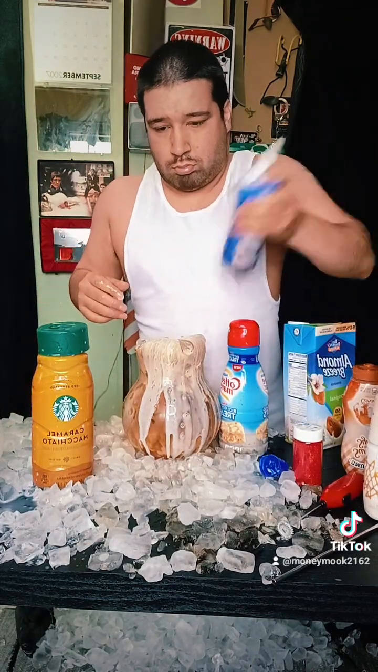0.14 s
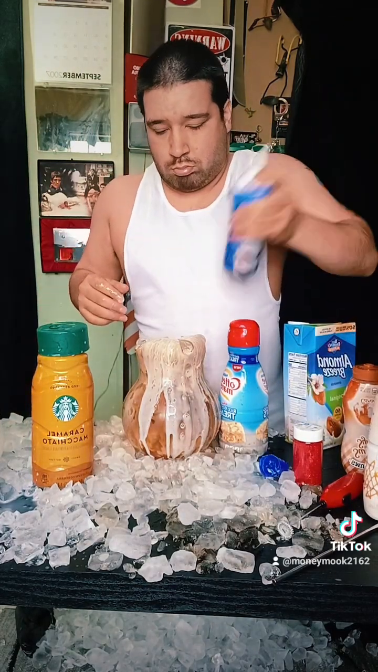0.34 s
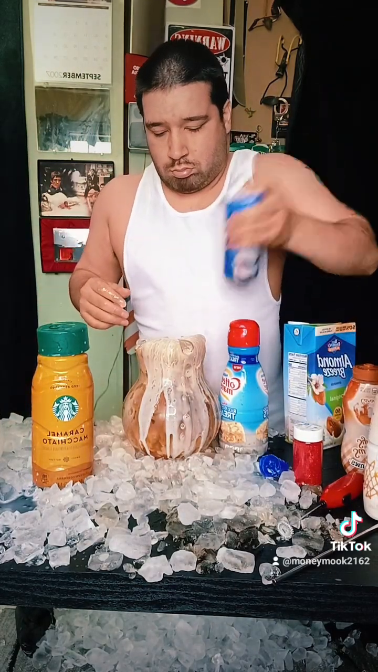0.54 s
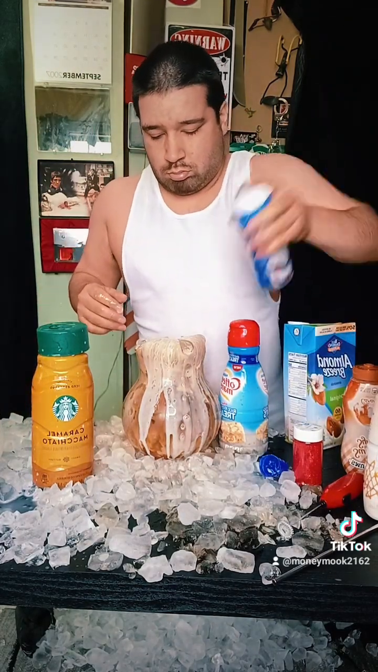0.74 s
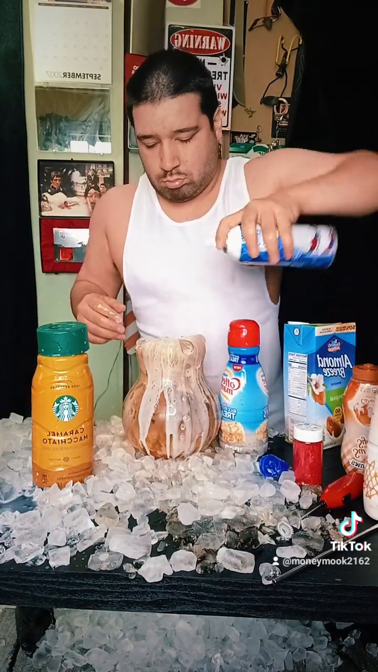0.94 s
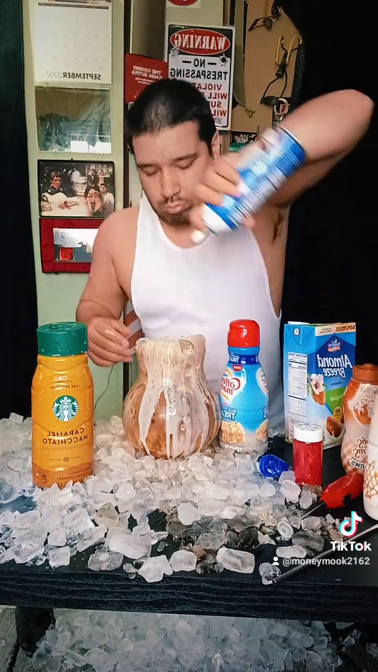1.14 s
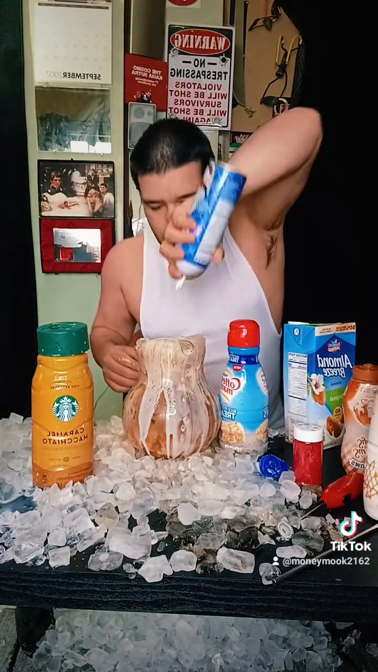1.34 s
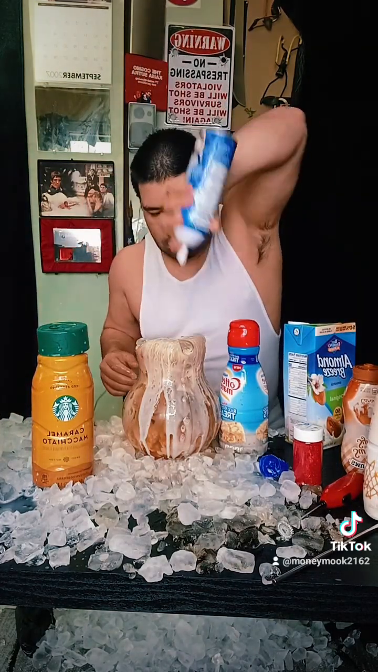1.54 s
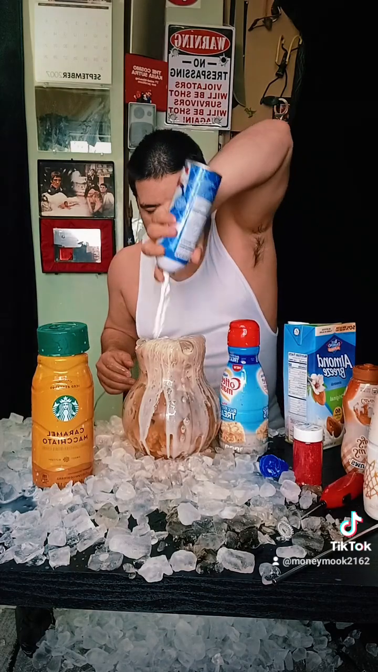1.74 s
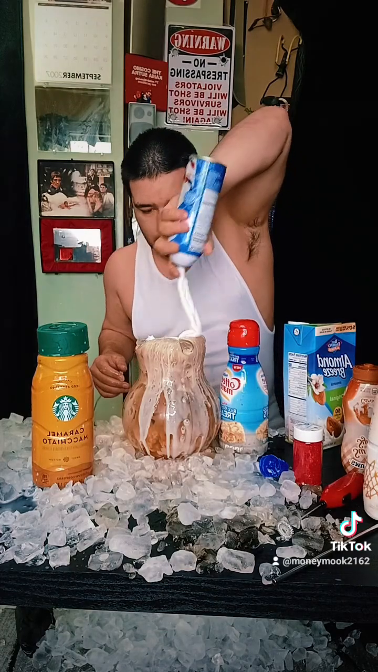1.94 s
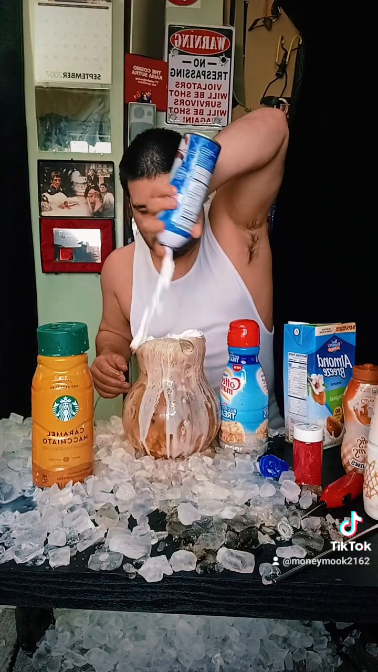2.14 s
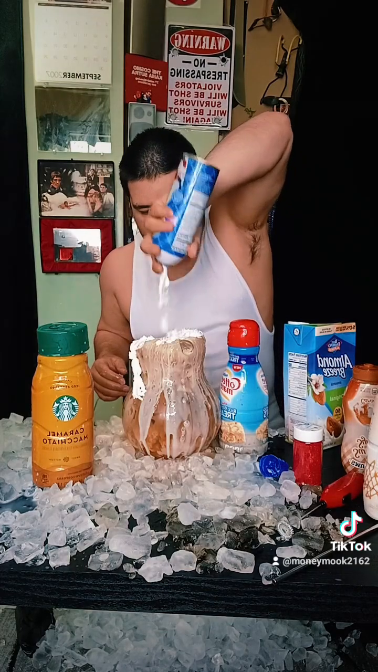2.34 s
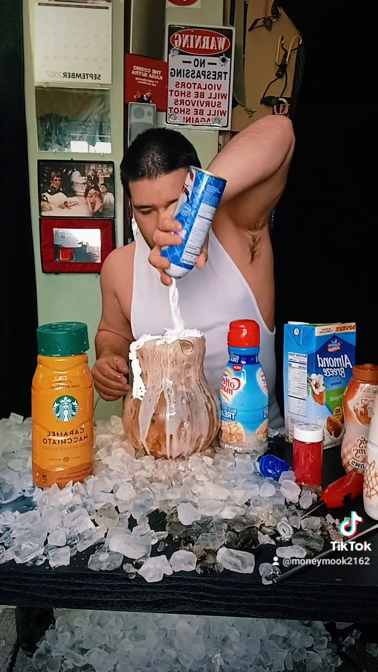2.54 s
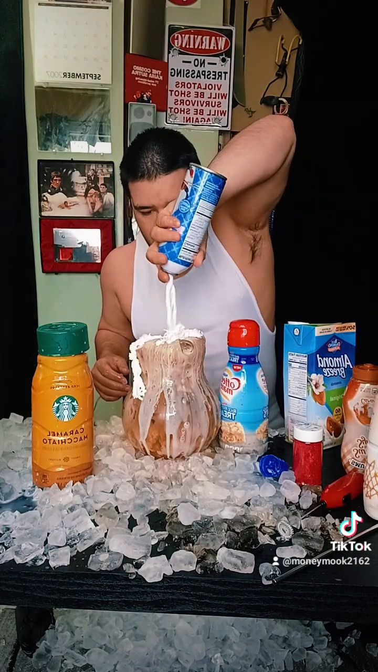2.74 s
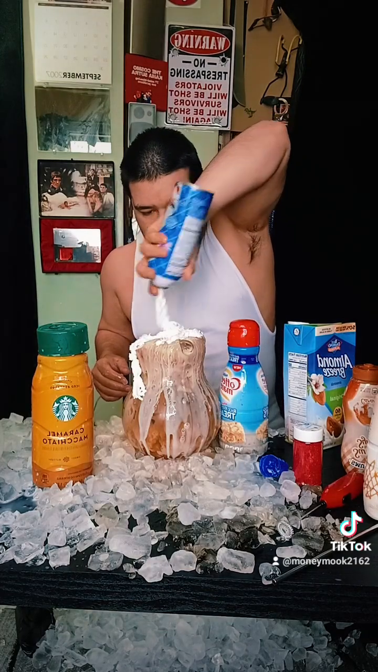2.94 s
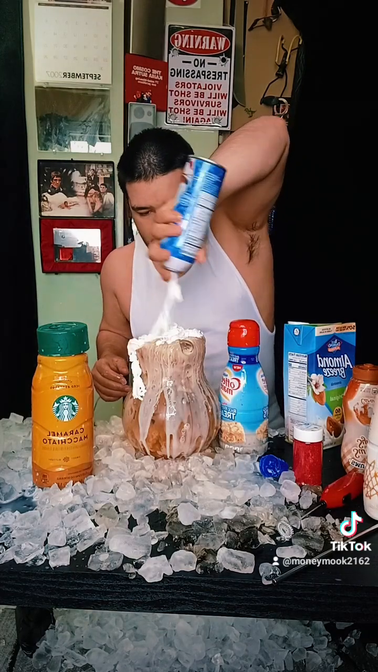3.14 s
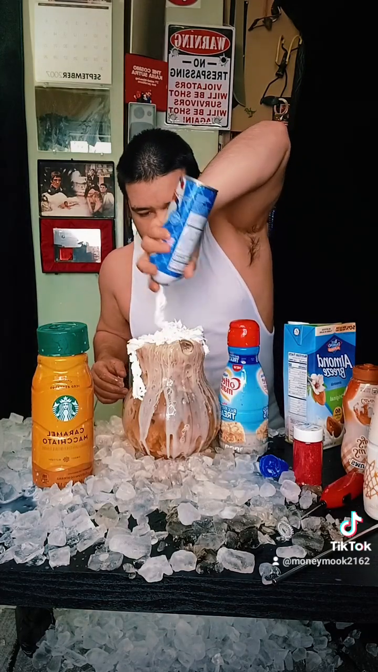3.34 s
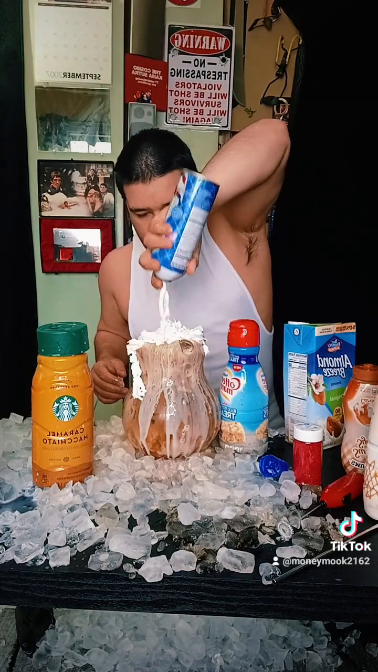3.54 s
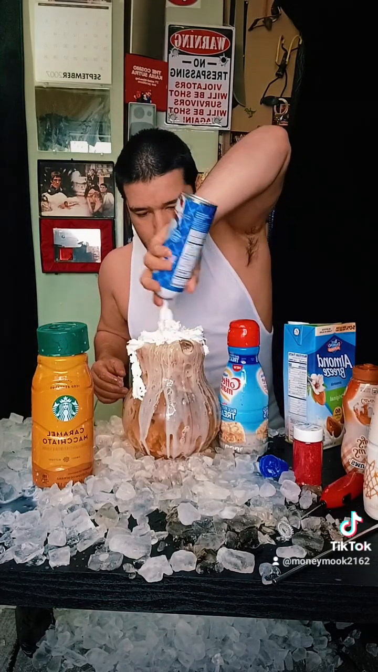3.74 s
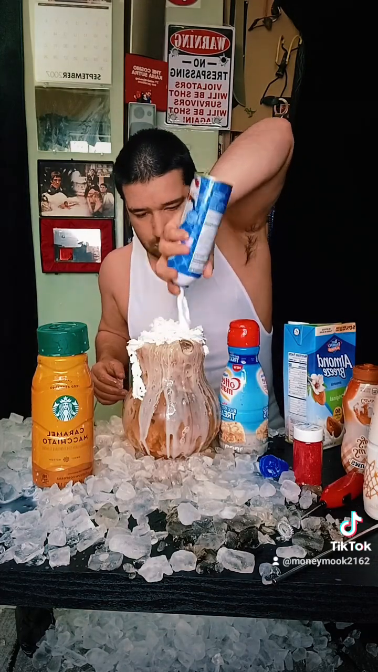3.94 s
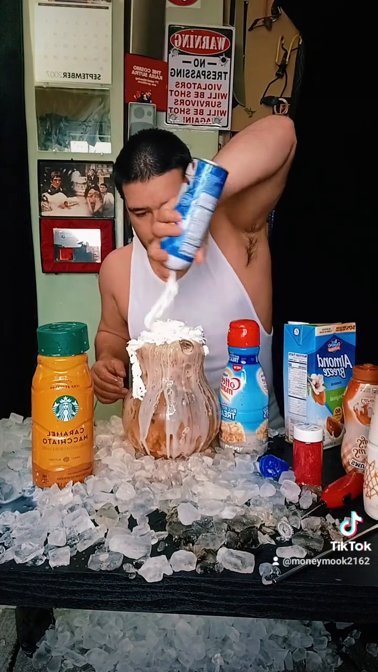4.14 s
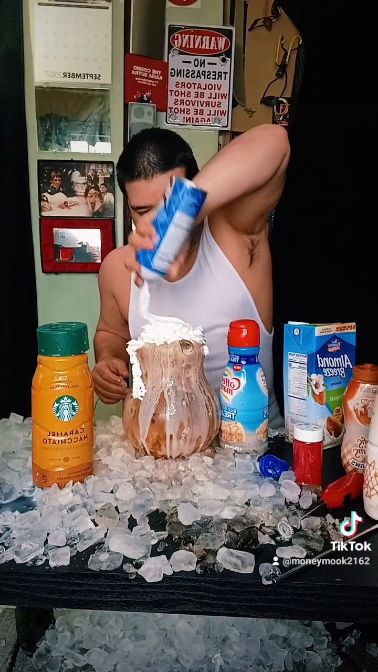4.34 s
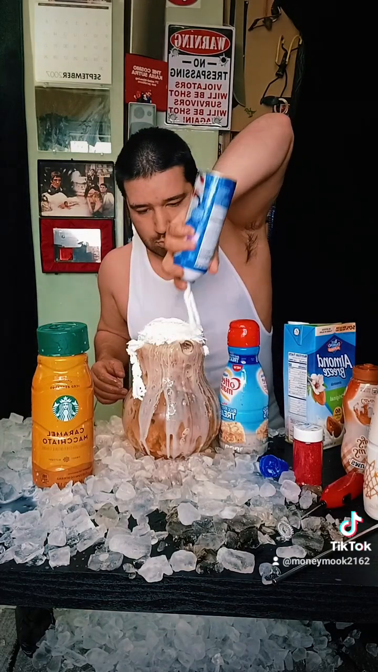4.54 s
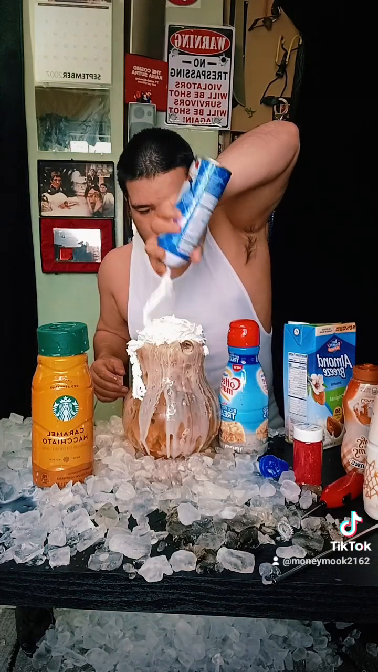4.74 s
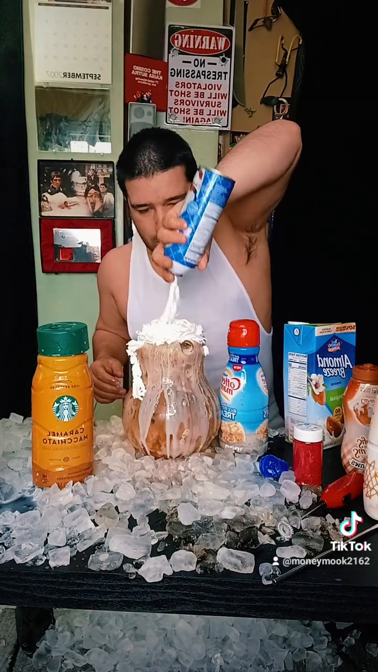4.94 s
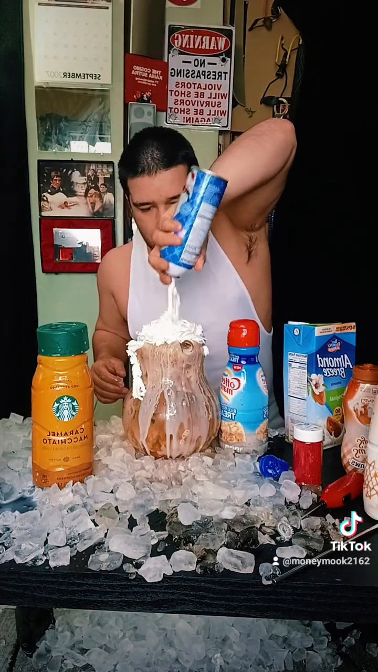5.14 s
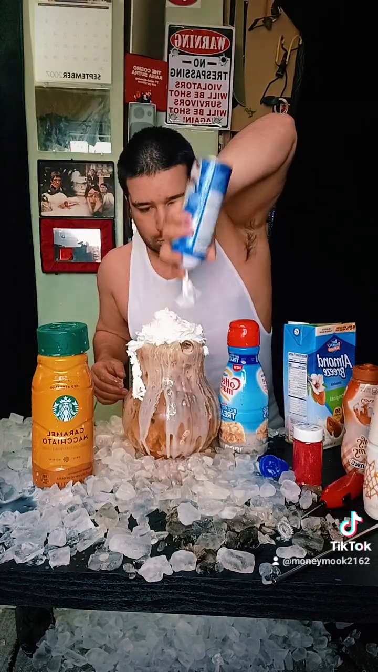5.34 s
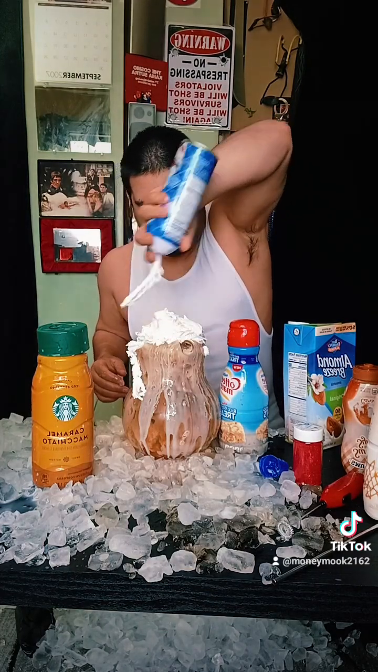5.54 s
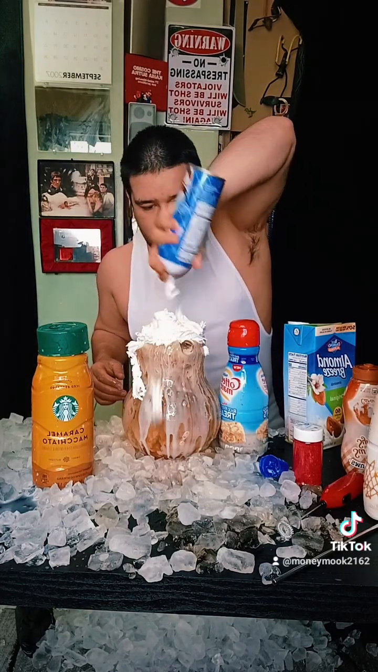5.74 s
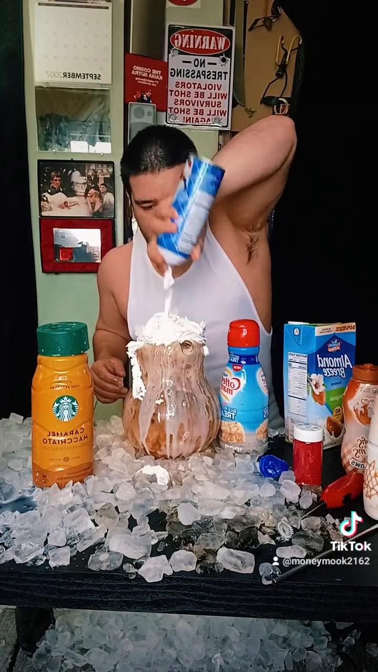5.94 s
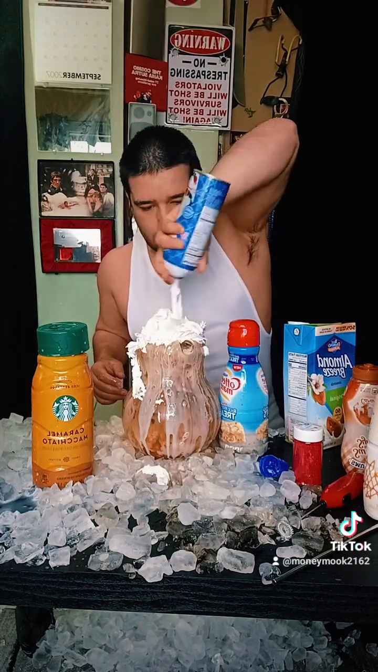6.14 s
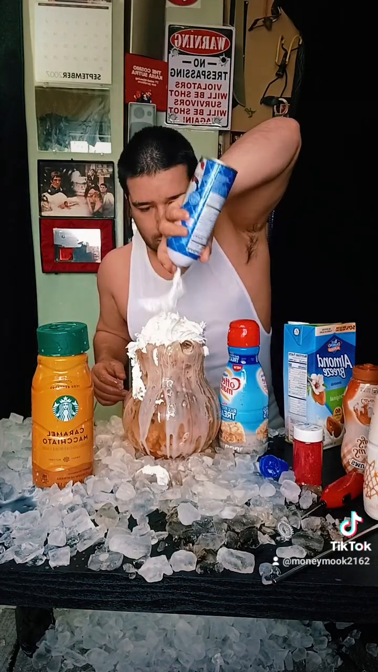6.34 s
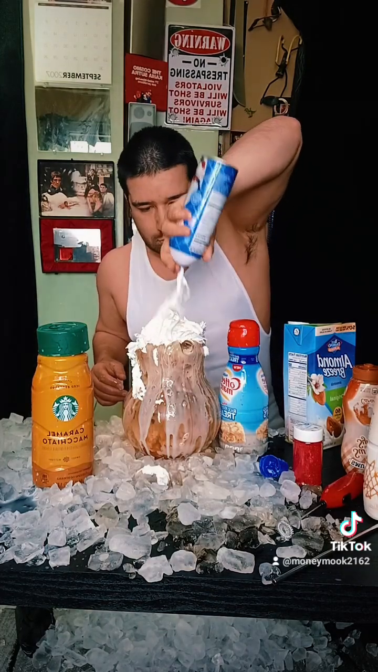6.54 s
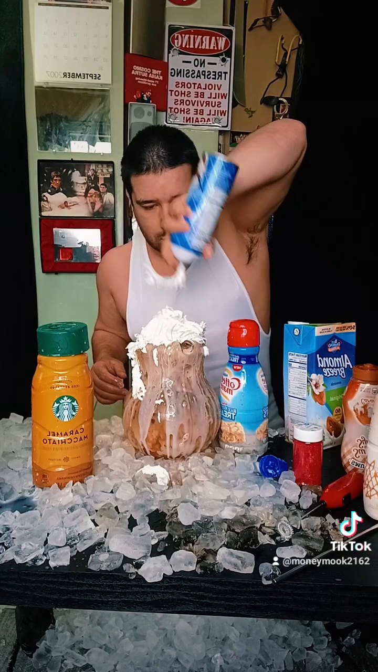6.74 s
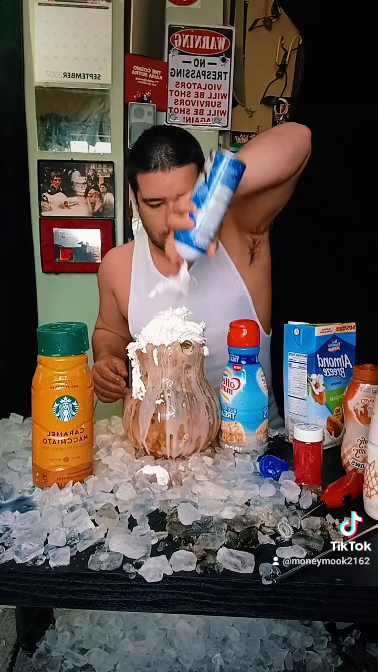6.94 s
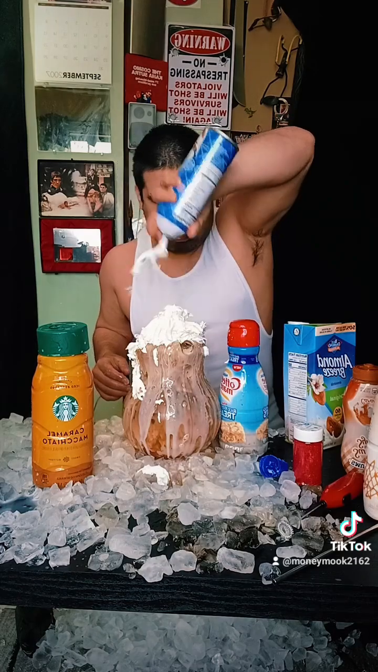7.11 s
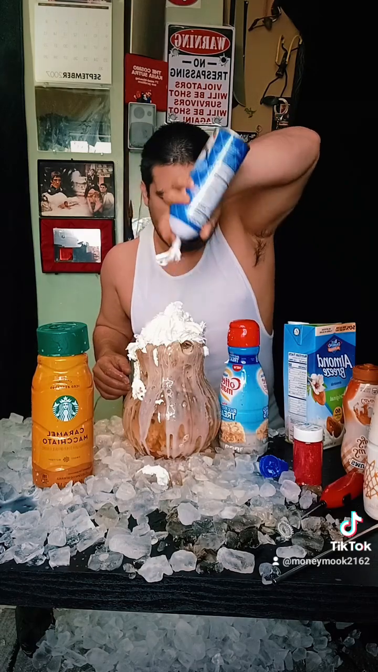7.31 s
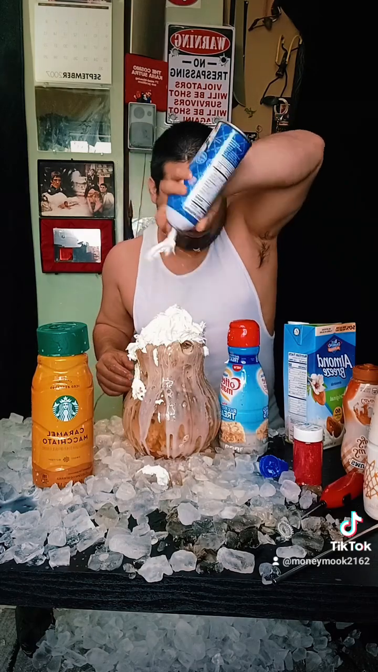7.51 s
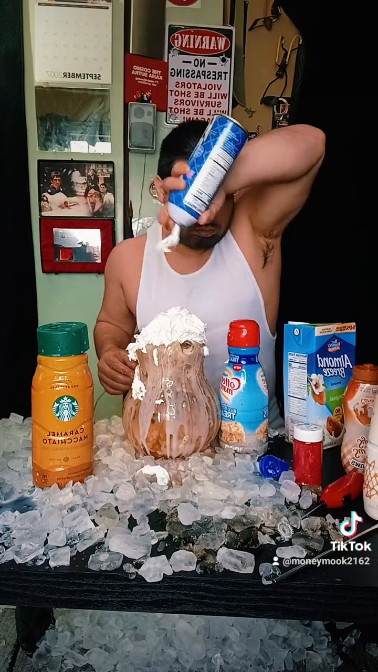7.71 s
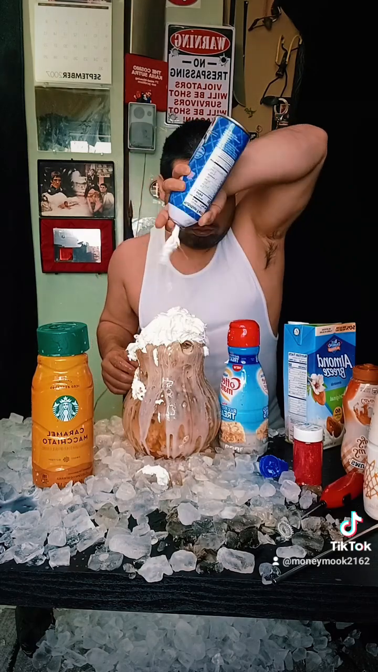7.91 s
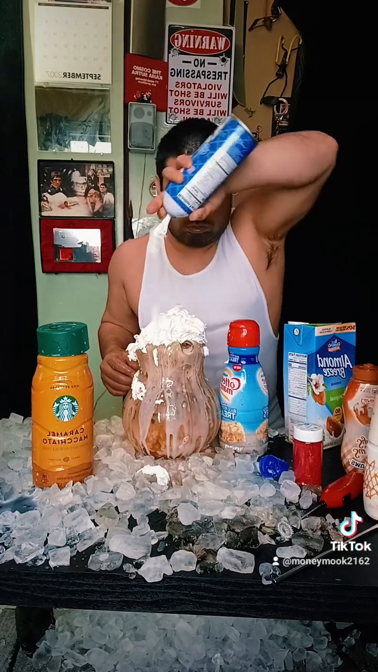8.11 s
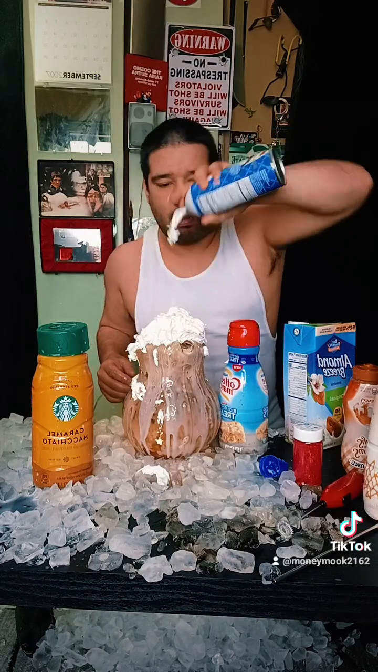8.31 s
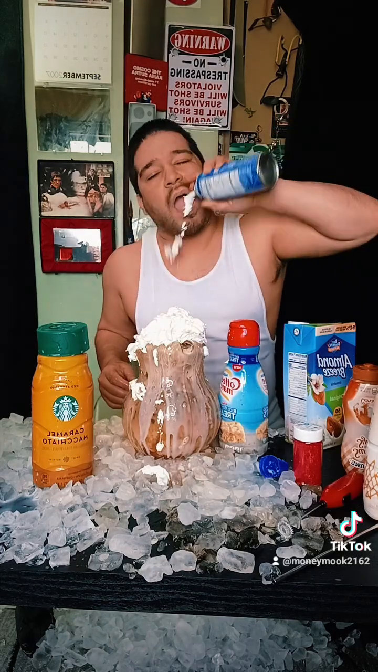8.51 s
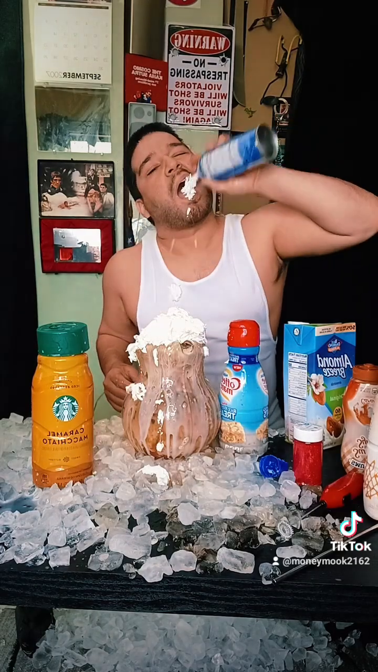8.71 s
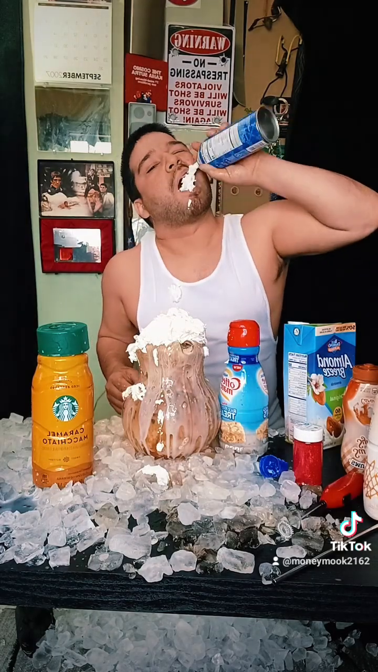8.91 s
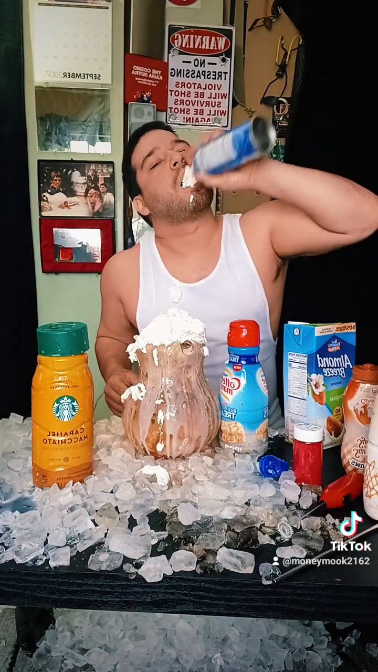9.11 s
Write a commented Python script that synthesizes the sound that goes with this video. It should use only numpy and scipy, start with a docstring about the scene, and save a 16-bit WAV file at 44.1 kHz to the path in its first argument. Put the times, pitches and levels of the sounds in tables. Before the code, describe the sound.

For the first second, a can of whipped cream is shaken with faint sloshing and soft knocks. A light shirt rustle and a few finger ticks follow as it is turned over. At about 1.7 seconds the valve opens with a brief squeak and a much louder, grainy hiss begins, running on to the end. Cream sputters onto a drink in a jug, with irregular spits, wet squelches from the plastic tip and a hollow rush from the jug. The spray weakens slightly as it goes on, and from about 6 to 8 seconds its draught rumbles faintly on the microphone. At about 8.5 seconds the nozzle moves to an open mouth, and the jet turns hollow and gurgling until just past 9 seconds. Everything sounds close, in a small, quiet room.

```python
"""A can of whipped cream is shaken, sloshing and knocking, then turned over with a rustle and finger ticks.
At 1.7 s the valve opens and gas and cream sputter onto a drink in a jug: a grainy, spitting hiss,
the squelch and ring of the plastic tip and a wet, hollow rush. The jet's draught rumbles faintly
on the microphone. At about 8.5 s the nozzle comes up to an open mouth, whose cavity hollows out
the jet and gurgles. It all plays in a small, quiet room."""
import sys
import numpy as np
from scipy import signal
from scipy.fft import rfft, irfft
from scipy.io import wavfile
from scipy.ndimage import uniform_filter1d

SR = 44100
rng = np.random.default_rng(int(sys.argv[2]) if len(sys.argv) > 2 else 0)


def file_out(sig):
    """Save sig as 16-bit WAV at sys.argv[1]."""
    # one column per channel
    cols = np.atleast_2d(sig).T
    # limit, then scale
    lim = np.clip(cols, -1, 1)
    pcm = np.round(lim * 32767).astype(np.int16)
    wavfile.write(sys.argv[1], SR, pcm)


N = 408807

# the finger tilts the valve: (time [s], opening [0-1])
VALVE_OPENING = [(1.728, 0), (1.765, 0.92)]
# tone of the escaping gas: (frequency [Hz], level [dB])
HISS_SPECTRUM = [(300, -18.5), (1000, -23), (1800, -11), (2600, -3), (4400, 1), (6200, -2.5), (7200, -1),
                 (8400, -2.5), (11000, -1.5), (12700, 1.5), (13800, -1.5), (15700, -4)]
CREAM_STARTS_S, CREAM_RISE_S = 1.738, 0.075  # the cream reaches the tip just after the gas


def from_db(db):
    return 10 ** (np.asarray(db) / 20)


def rms_one(x):
    return x / np.sqrt(np.mean(x ** 2) + 1e-20)


def highpass(x, hz, order):
    return signal.sosfilt(signal.butter(order, hz, "high", fs=SR, output="sos"), x)


def in_time(rows):
    """Each column after the time column as a curve over all samples."""
    s, *columns = np.transpose(rows)
    return [np.interp(np.arange(N) / SR, s, c) for c in columns]


def swell(s, half_s):
    """A smooth rise and fall of height 1 around s."""
    return np.exp(-np.minimum(((np.arange(N) / SR - s) / half_s) ** 2, 50))


def drift(rate_hz):
    """A smooth, bounded random curve; rms 1."""
    knots = np.clip(rng.standard_normal(SR // 2), -2, 2)
    return rms_one(np.interp(np.arange(N) * rate_hz / SR, np.arange(len(knots)), knots))


def flutter(rate_hz):
    """A fast random curve with its slow swells taken out; rms 1."""
    fast = drift(rate_hz)
    return rms_one(fast - uniform_filter1d(fast, size=1100))


def colour(x, spectrum):
    """Minimum-phase EQ with the given spectrum; rms 1."""
    hz, db = np.transpose(spectrum)
    grid = np.maximum(np.fft.rfftfreq(8192, 1 / SR), 1)
    gain = from_db(np.interp(np.log(grid), np.log(hz), db))
    cepstrum = irfft(np.log(gain))
    half = len(cepstrum) // 2
    folded = np.r_[cepstrum[0], 2 * cepstrum[1:half], np.zeros(half)]
    impulse = irfft(np.exp(rfft(folded)))[:half]
    return rms_one(signal.fftconvolve(x, impulse)[:N])


def resonate(x, modes):
    """Parallel steep resonances, given as (pitch [Hz], width [Hz], level [dB]); rms 1."""
    out = 0
    for hz, width_hz, db in modes:
        r = np.exp(-np.pi * width_hz / SR)
        gain = (1 - r * r) / 2
        section = [gain, 0, -gain, 1, -2 * r * np.cos(2 * np.pi * hz / SR), r * r]
        out = out + from_db(db) * signal.sosfilt([section, section], x)
    return rms_one(out)


def moving_band(x, hz, width_hz, block=384):
    """One resonance whose centre glides, stepped in short blocks."""
    out, state = np.zeros(N), np.zeros(2)
    r = np.exp(-np.pi * width_hz / SR)
    for i in range(0, N, block):
        poles = [1, -2 * r * np.cos(2 * np.pi * hz[i] / SR), r * r]
        out[i:i + block], state = signal.lfilter([1, 0, -1], poles, x[i:i + block], zi=state)
    return out * (1 - r * r) / 2


def steep_band(x, hz, width_hz):
    """A gliding resonance applied twice, for steeper skirts."""
    return moving_band(moving_band(x, hz, width_hz), hz, width_hz)


def wandering(x, modes, pitch_share, level_db, rate_hz=11):
    """Resonances that each waver in pitch and strength on their own."""
    out = 0
    for hz, width_hz, db in modes:
        centre_hz = hz * (1 + pitch_share * drift(rate_hz))
        out = out + from_db(db + level_db * drift(rate_hz)) * steep_band(x, centre_hz, width_hz)
    return out


def burst(noise, s, t60):
    """Noise that starts at s and dies away."""
    out, start = np.zeros(N), max(round(s * SR), 0)
    age = np.arange(min(SR // 2, N - start)) / SR
    out[start:start + len(age)] = noise[:len(age)] * from_db(-60 * age / t60)
    return out


def struck(s, db, modes, t60):
    """A short burst of noise ringing in the given resonances."""
    return from_db(db) * burst(resonate(rng.standard_normal(SR), modes), s, t60)


def pops(per_s, spread_db=0, max_spreads=0):
    """Clicks at random times, all one size unless given a spread; rms 1."""
    born = rng.random(N) < per_s / SR
    sizes = rng.laplace(size=N)[born]
    out = np.zeros(N)
    out[born] = np.sign(sizes) * from_db(spread_db * np.minimum(np.abs(sizes), max_spreads))
    return rms_one(out)


def room_tone():
    """The low, steady bed of a quiet room."""
    # tone of the room's air: (frequency [Hz], level [dB])
    spectrum = [(25, -24), (40, -30), (55, 4), (115, 7), (220, 2), (400, -6), (1100, -17), (2500, -20),
                (9000, -36), (15000, -34)]
    return from_db(-75.5) * colour(rng.standard_normal(N), spectrum)


def room(x, t60, wet_db, gap_s):
    """Bottles, shelves and walls scatter the shorter waves into a brief, slightly dull tail."""
    age = np.arange(SR // 2) / SR
    dull_noise = signal.lfilter([1], [1, -.45], rng.standard_normal(len(age)))
    tail = highpass(dull_noise * from_db(-60 * age / t60) * (age > gap_s), hz=1500, order=2)
    return x + from_db(wet_db) * signal.fftconvolve(x, tail / np.linalg.norm(tail))[:N]


def draught():
    """Spent gas drifts over the microphone in soft lumps."""
    # strength of the draught: (time [s], relative level [dB])
    levels = [(1.8, -70), (2.4, -67), (4.5, -63), (5.85, -61), (6.2, -56), (7.0, -49.5), (7.3, -56),
              (8.05, -53), (9.25, -68.5)]
    # its rumble: (frequency [Hz], level [dB])
    spectrum = [(25, -48), (42, -16), (58, -7), (100, 1), (150, 1.5), (180, -3.5), (225, 7.5), (290, -4.5),
                (600, -25), (2000, -56)]
    level_db, = in_time(levels)
    opening, = in_time(VALVE_OPENING)
    return opening * from_db(level_db + 2.5 + 3.1 * drift(25)) * colour(rng.standard_normal(N), spectrum)


def shirt_rustle():
    """The arm brushes past the shirt as it turns the can over."""
    # strokes on the cloth: (middle [s], half length [s], level [dB])
    brushes = [(.2, .25, -76.5), (0.658, 0.18, -76), (0.963, 0.035, -68), (1.138, 0.048, -62.5),
               (1.25, 0.043, -63.5), (1.41, 0.087, -61), (1.583, 0.44, -66)]
    # tone of the cloth: (frequency [Hz], level [dB])
    spectrum = [(500, -4), (1700, -10.5), (3200, -5.5), (5200, 1), (6200, -3.5), (7250, 3), (8600, -13),
                (9700, -3), (11000, -12), (12300, 1), (13000, -2), (14300, -5), (15700, 4.5)]
    brushing = sum(from_db(db) * swell(s, half_s) for s, half_s, db in brushes)
    return brushing * from_db(2.3 * drift(270)) * colour(rng.standard_normal(N), spectrum)


def fingers():
    """Fingers tick on metal and plastic, then the grip tightens and taps the can's wall."""
    # finger ticks: (time [s], level [dB], pitch [Hz])
    ticks = [(.384, -74, 7000), (.526, -62, 6750), (.559, -59, 5530), (.632, -66, 5200), (.66, -66, 4700),
             (.681, -67, 14000), (.767, -71, 5500), (.967, -50, 12800), (1.175, -45.5, 9900),
             (1.393, -54, 7100), (1.445, -56, 4180), (1.626, -60, 12570), (1.644, -63, 6800)]
    # ring of the tapped wall: (pitch [Hz], width [Hz], level [dB])
    wall_modes = [(3270, 300, 4), (3950, 250, -3), (4550, 400, -1), (5150, 500, 1)]
    grip = struck(s=1.644, db=-61, modes=wall_modes, t60=0.041)
    return grip + sum(struck(s, db, [(hz, .36 * hz, 0)], t60=0.026) for s, db, hz in ticks)


def shaken_can(shake_end_s=0.57, fade_db_per_s=34):
    """Cream sloshes along the can, surging at each knock, and settles when the shaking ends."""
    # cream knocks in the can: (time [s], level [dB], pitch [Hz], width [Hz])
    knocks = [(.125, -68, 750, 500), (.317, -61, 540, 280), (.42, -78, 1100, 890), (.526, -74, 800, 900),
              (.615, -69, 520, 450), (.718, -75, 1870, 250), (.742, -73, 1850, 200),
              (.803, -74, 1100, 1000)]
    # the wall rings with every knock: (pitch [Hz], width [Hz], level [dB])
    can_ring = [(1800, 1700, -17)]
    # tone of the slosh: (frequency [Hz], level [dB])
    spectrum = [(100, -30), (350, 1), (650, -4), (1400, -8), (1850, -11), (3000, -19), (8000, -38)]
    settling_db = fade_db_per_s * np.maximum(np.arange(N) / SR - shake_end_s, 0)
    surge_db = 3 * np.minimum(sum(swell(s + 0.015, half_s=0.015) for s, *_ in knocks), 1)
    slosh_db = -79 - settling_db + surge_db + 1.7 * drift(70.3)
    slosh = from_db(slosh_db) * colour(rng.standard_normal(N), spectrum)
    return slosh + sum(struck(s, db, [(hz, width, 0)] + can_ring, t60=0.13) for s, db, hz, width in knocks)


def bump_squeak_splutter():
    """A dull bump as the shaking starts, the valve's first squeak, a splutter as cream meets the rim."""
    # the three one-shots: (time [s], level [dB], pitch [Hz], width [Hz], t60 [s])
    hits = [(.005, -66, 113, 50, 0.96), (1.76, -32, 4000, 450, 0.12), (2.28, -35, 1600, 500, 0.26)]
    return sum(struck(s, db, [(hz, width_hz, 0)], t60) for s, db, hz, width_hz, t60 in hits)


def foam(glug, cells):
    """Wet turbulence: fresh noise on the slugs and bursting cells that the whole flow shares."""
    return rms_one(glug * (rng.standard_normal(N) + 0.7 * cells))


def jug(rush, glug, cells, flow_db):
    """The jet rings the jug as the hand circles over it; heaping cream smothers the low, hollow note."""
    # the jet skirts the rim, fills the jug, drifts away: (time [s], share that rings the jug [0-1])
    aim = [(1.8, 0.9), (2.3, 0.65), (2.42, 1), (7.8, 0.95), (8.25, 0.8), (8.55, 0.28)]
    # the jug's cavity: (pitch [Hz], width [Hz], level [dB])
    modes = [(412, 38, 3), (552, 61, 5.5), (651, 92, 8.5), (997, 30, 2), (1087, 26, 7.5), (1174, 73, 10),
             (1608, 60, 0.5)]
    # resonances that depend on where the jet points: (pitch [Hz], width [Hz], level [dB])
    circling_modes = [(783, 78, 0.5), (1323, 72, 1.5)]
    # the hand circles about four times a second: (time [s], swings so far [count])
    swings = [(1.87, 0), (2.4, 2), (3.38, 6), (4.43, 10), (5.33, 14), (5.6, 15), (6.5, 19), (7.55, 22),
              (8.35, 25)]
    over_jug, = in_time(aim)
    # the growing heap unsettles the resonances
    cavity = wandering(rush, modes, pitch_share=0.0071, level_db=1)
    body = from_db(-37 + 0.35 * flow_db) * rms_one(rush + over_jug * cavity)
    swing_db = 2.5 * np.cos(2 * np.pi * in_time(swings)[0])
    # twice the jet points straight in
    deep_db = 4.9 * swell(4.429, half_s=0.044) + 5.3 * swell(5.598, half_s=0.044)
    circling = rms_one(wandering(foam(glug, cells), circling_modes, pitch_share=0.016, level_db=0.64))
    circling *= np.sqrt(over_jug) * from_db(-41.5 + 0.63 * flow_db + swing_db + deep_db)
    smother_db = np.arange(N) / SR - CREAM_STARTS_S  # 1 dB a second
    hollow = from_db(-46.5 + flow_db / 2 - smother_db) * resonate(foam(glug, cells), [(353, 156, 0)])
    return body + circling + hollow


def mouth(rush, glug, cells, flow_db, swallowed_hz):
    """The jet rings the mouth; the moving jaw unsettles its resonances and pooling cream gurgles."""
    # the mouth's cavity: (pitch [Hz], width [Hz], level [dB])
    modes = [(501, 75, -3.5), (1760, 180, 2), (2036, 460, 5.5), (2890, 640, 1), (3250, 200, -5),
             (4430, 400, -7), (4970, 610, -3), (6950, 650, -10)]
    # the vowel sits just under the swallowed band and sinks as the jaw closes
    vowel = from_db(2.5) * moving_band(foam(glug, cells), 0.85 * swallowed_hz, width_hz=150)
    cavity = wandering(foam(glug, cells), modes, pitch_share=0.024, level_db=0.79)
    gurgle = rms_one(from_db(1.6 * drift(70)))
    return from_db(-30.5 + 0.29 * flow_db) * rms_one(0.13 * rush + vowel + cavity) * gurgle


def off_the_face(jet, notch_hz):
    """The echo from the nearing face dips notch_hz and its odd multiples: a comb that sweeps upward."""
    strength = 0.39 * swell(8.52, half_s=0.12)
    n = np.arange(N)
    echo = np.interp(n - SR / (2 * notch_hz), n, jet)
    return (jet + strength * echo) / np.sqrt(1 + strength ** 2)


def into_the_mouth(jet, entering, swallowed_hz):
    """The cavity hollows the jet out: two steady dips in the treble and one that moves with the jaw."""
    # treble that the mouth swallows: (frequency [Hz], width [Hz], depth [0-1])
    dips = [(3750, 400, .5), (5800, 500, .35)]
    inside = np.minimum(2 * entering, 1) ** 4
    for hz, width_hz, depth in dips:
        jet = jet - depth * inside * moving_band(jet, np.full(N, hz), width_hz)
    return jet - np.sqrt(entering) * moving_band(jet, swallowed_hz, width_hz=245)


def squelch(turbulence, flow_db, slit_hz, coated_s=3.2):
    """Cream narrows the tip's slit and makes it squelch, loudest before the clean tip gets coated."""
    fresh_db = 2.5 * np.clip(2 * (coated_s - np.arange(N) / SR), 0, 1)
    slit = rms_one(steep_band(turbulence, slit_hz, width_hz=600))
    return from_db(-40 + 0.8 * flow_db + fresh_db) * slit


def tip_ring(glug, cells, flow_db):
    """Passing cream rings the plastic tip and slugs smack through; a whistle stays as the flow thins."""
    # the tip's wavering ring: (pitch [Hz], width [Hz], level [dB])
    modes = [(2320, 300, -1), (2522, 510, 1.5), (3182, 120, -1), (3454, 70, -5)]
    # its ring under a slug: (pitch [Hz], width [Hz], level [dB])
    smack_modes = [(2470, 890, 1), (4100, 1500, -3)]
    ring = rms_one(wandering(foam(glug, cells), modes, pitch_share=.022, level_db=.9))
    whistle = from_db(-51) * resonate(foam(glug, cells), [(2660, 200, 0)])
    smacks = from_db(-5) * resonate(pops(per_s=55, spread_db=4.5, max_spreads=1.24), smack_modes)
    return from_db(-34.5 + 0.94 * flow_db) * (ring + smacks) + whistle


def bubbles(per_s, sharpness):
    """Bubbles of many sizes burst at the tip, per_s of each, ringing a few cycles at their pitch."""
    out = 0
    for hz in np.geomspace(1900, 14000, num=18):
        out = out + resonate(pops(per_s, spread_db=2, max_spreads=3), [(hz, hz / sharpness, 0)])
    return rms_one(out)


def spitting(t60=0.011):
    """Each gas pocket cracks open and rings briefly at a pitch set by its size."""
    # pockets spitting through the cream: (time [s], relative level [dB], pitch [Hz])
    spits = [(2.0824, -23, 4500), (2.2145, -31, 6500), (2.3984, -22, 3877), (2.8458, -27, 3760),
             (3.6561, -18.5, 2800), (3.7808, -25, 3450), (3.7955, -27, 12500), (3.8012, -22, 7200),
             (3.8725, -19, 3600), (3.9594, -22, 4130), (4.3184, -23, 2080), (4.3536, -26, 3200),
             (4.358, -24, 4820), (4.5894, -29, 4800), (4.7007, -21, 4440), (4.7819, -21, 3173),
             (5.079, -35, 6000), (5.5274, -20, 3140), (5.7039, -22, 2403), (6.2512, -26, 8900),
             (6.6626, -26, 5860), (6.8257, -19, 2060), (7.2249, -27, 4380), (7.7726, -27, 3120),
             (8.0797, -21, 3800), (8.184, -26, 4480), (8.5734, -19, 4130), (8.6523, -22, 7200),
             (8.929, -23, 4430), (8.9835, -26, 4820), (9.1698, -20, 3100)]
    out = 0
    for s, db, hz in spits:
        crack = from_db(db - 7) * burst(colour(rng.standard_normal(SR // 2), HISS_SPECTRUM), s, t60)
        out = out + crack + struck(s, db - 1.2, [(hz, 0.6 * hz, 0)], t60)
    return out


def gas_hiss(sputter, cells, spurt_decay_s=.0016):
    """Gas rushes out of the valve, clumped by short spurts and grainy with bubbles and cracking foam."""
    # the hiss sags as the can empties: (time [s], relative level [dB])
    levels = [(1.77, -33.5), (2.25, -32), (3.0, -32.5), (6.1, -35), (6.4, -35.5), (7.8, -36), (8.6, -34),
              (9.27, -37.5)]
    # longer gulps of gas make it surge: (time [s], level [dB])
    gulps = [(2.2145, -32.5), (2.398, -32), (2.55, -38), (2.845, -33), (3.797, -30), (3.872, -45),
             (4.359, -30), (4.405, -37), (4.589, -34), (4.782, -45), (5.079, -32), (5.515, -41),
             (5.75, -40), (6.225, -34), (6.826, -36), (8.19, -37), (8.562, -35), (8.651, -41)]
    onsets = np.abs(pops(per_s=85, spread_db=4.5, max_spreads=2.2))
    spurts = rms_one(signal.lfilter([1], [1, -np.exp(-1 / (spurt_decay_s * SR))], onsets))
    gas = rms_one(sputter * (rng.standard_normal(N) + 0.53 * cells))
    gas += .56 * spurts * rng.standard_normal(N)
    crackle = from_db(-7.5) * highpass(pops(per_s=120), hz=3200, order=2)
    gas += crackle + .52 * bubbles(per_s=70, sharpness=22)
    # the gap between cream and tip keeps changing, so a broad peak roams through the hiss
    roam_hz = 6920 * 2 ** (0.65 * drift(16))
    gas += from_db(-6) * moving_band(gas, roam_hz, width_hz=1100)
    steady = from_db(in_time(levels)[0] + 1)
    surges = sum(from_db(db) * swell(s, half_s=0.016) for s, db in gulps)
    return np.hypot(steady, surges) * colour(gas, HISS_SPECTRUM)


def spray(full_flow_db=-32.5):
    """One sputtering jet feeds the hiss, the tip's ring and the cavity that it points into."""
    # flow of cream through the tip: (time [s], relative level [dB])
    flow = [(1.78, -43), (1.92, -36.5), (2.01, -37), (2.7, -34), (3.05, -36), (3.5, -34.5), (4.35, -37),
            (6.3, -37), (6.41, -44), (6.53, -39), (7.33, -42), (8.25, -42), (8.75, -40), (8.87, -37),
            (8.98, -42.5), (9.27, -42.5)]
    # the tip bends under the finger, so the squelch glides: (time [s], pitch [Hz])
    slit_pitch = [(1.85, 3950), (1.93, 3050), (2.04, 3600), (2.1, 4150), (2.17, 3450), (2.25, 3050),
                  (2.39, 3900), (2.46, 3300), (2.68, 3720), (3.0, 3540), (3.12, 3150), (3.25, 3180),
                  (3.37, 3650), (3.5, 3330), (3.87, 3600), (4.36, 3530), (4.5, 3070), (4.73, 3850),
                  (4.83, 3830), (4.95, 3480), (7.5, 3690), (8.3, 4000)]
    # the nozzle comes up to the mouth: (time [s], share entering [0-1], swallowed band [Hz])
    mouth_path = [(8.1, 0.08, 248), (8.42, 0.1, 434), (8.55, 0, 720), (8.68, 0.63, 1320),
                  (8.86, 0.95, 1290), (9.0, 0.9, 1160), (9.13, 0.6, 970), (9.27, 0.08, 870)]
    opening, = in_time(VALVE_OPENING)
    flow_db = in_time(flow)[0] - full_flow_db
    slit_hz = in_time(slit_pitch)[0] + 55 * drift(13)
    entering, swallowed_hz = in_time(mouth_path)
    # slugs of cream choke and free the valve, fast and unevenly
    sputter = from_db(0.61 * flutter(700) + .25 * drift(14))
    glug = sputter * from_db(1.75 * flutter(380))
    cells = pops(per_s=2600)
    hiss = gas_hiss(sputter, cells) + spitting()
    # the slit dips a band just above its pitch
    hiss -= .4 * moving_band(hiss, 1.19 * slit_hz, width_hz=450)
    tip = squelch(foam(glug, cells), flow_db, slit_hz) + tip_ring(glug, cells, flow_db)
    # wet rush of the cream: (frequency [Hz], level [dB])
    rush_spectrum = [(150, 1), (310, -6.5), (600, -1.5), (1200, 1.5), (1600, -1), (2000, -2), (2800, -9.5),
                     (6000, -25)]
    rush = colour(foam(glug, cells), rush_spectrum)
    cream = np.sqrt(1 - entering) * (tip + jug(rush, glug, cells, flow_db))
    cream += np.sqrt(entering) * mouth(rush, glug, cells, flow_db, swallowed_hz)
    arrival = np.clip((np.arange(N) / SR - CREAM_STARTS_S) / CREAM_RISE_S, 0, 1)
    # so small a nozzle radiates hardly any bass
    jet = highpass(opening * hiss + arrival * cream, hz=300, order=5)
    return into_the_mouth(off_the_face(jet, swallowed_hz), entering, swallowed_hz)


def scene():
    """Everything reaches one microphone, alike in both channels."""
    close = spray() + shaken_can() + shirt_rustle() + fingers() + bump_squeak_splutter()
    mono = room(close, t60=0.12, wet_db=-10.5, gap_s=0.00483) + draught() + room_tone()
    return np.array([mono, mono])


def record(dry):
    """A steep low-pass takes off the very top."""
    cutoff_hz = 15750
    return signal.sosfilt(signal.ellip(12, .2, 80, cutoff_hz, fs=SR, output="sos"), dry)


dry = scene()
out = record(dry)
file_out(out)
```